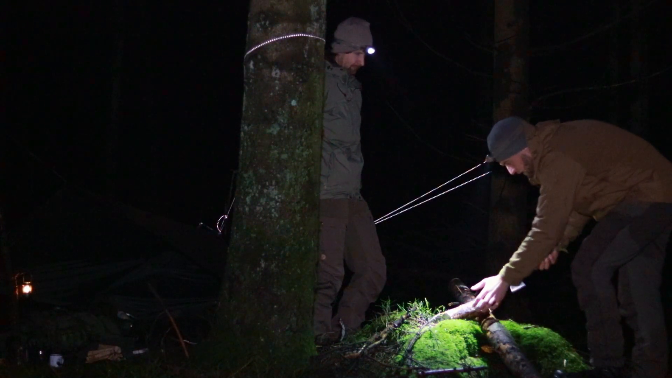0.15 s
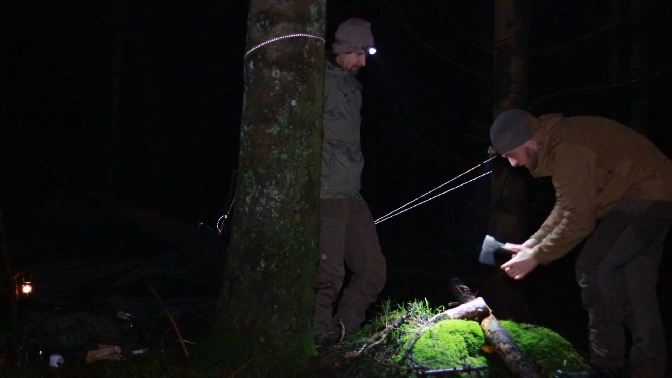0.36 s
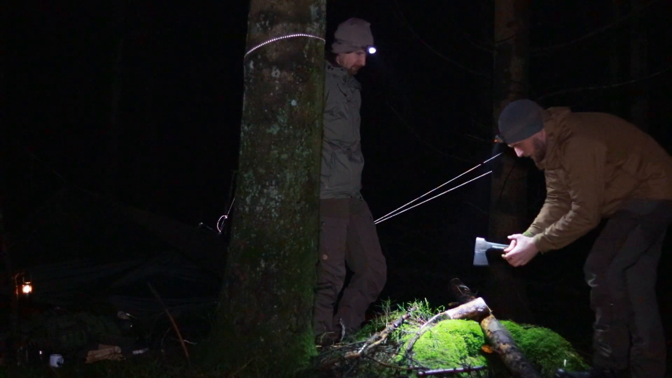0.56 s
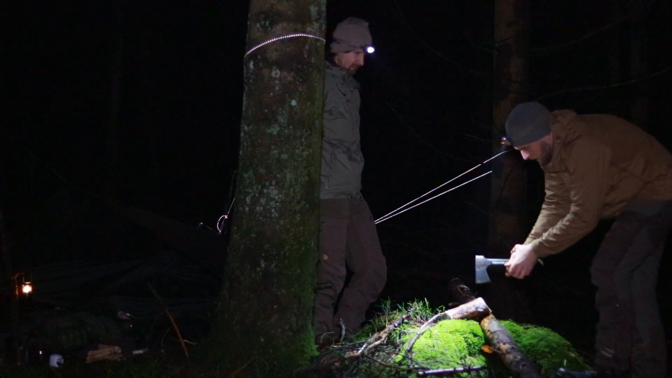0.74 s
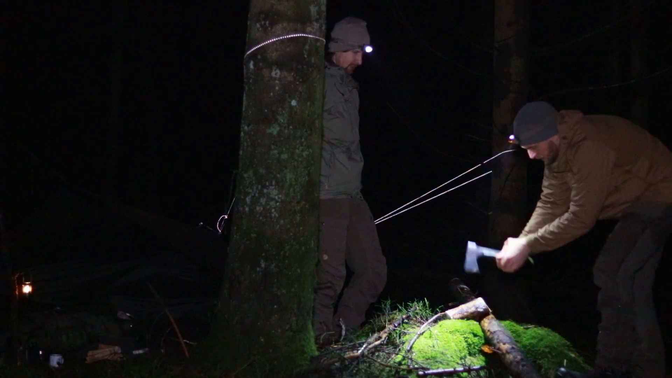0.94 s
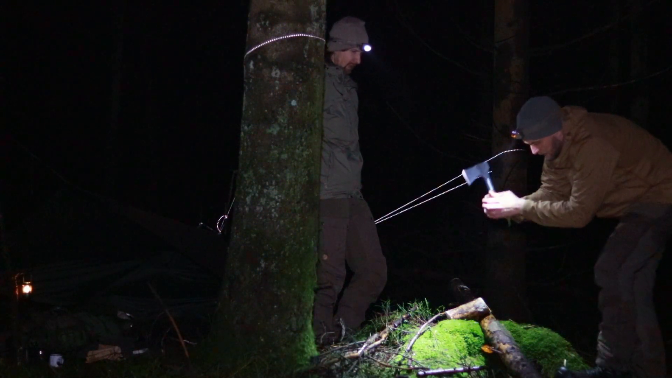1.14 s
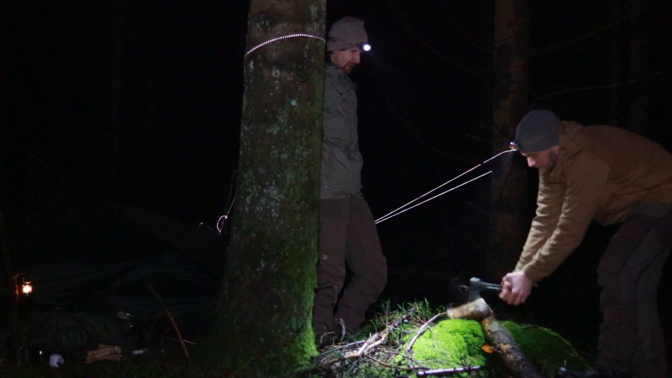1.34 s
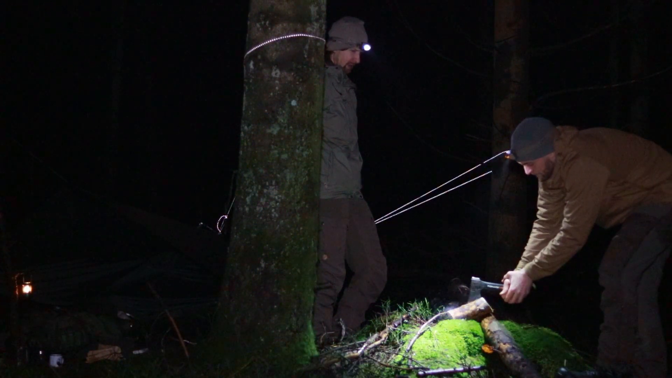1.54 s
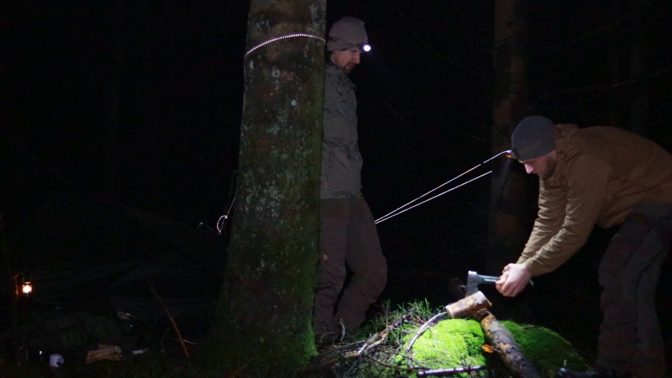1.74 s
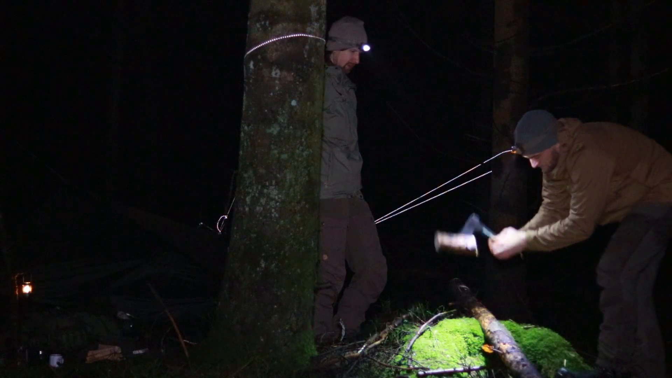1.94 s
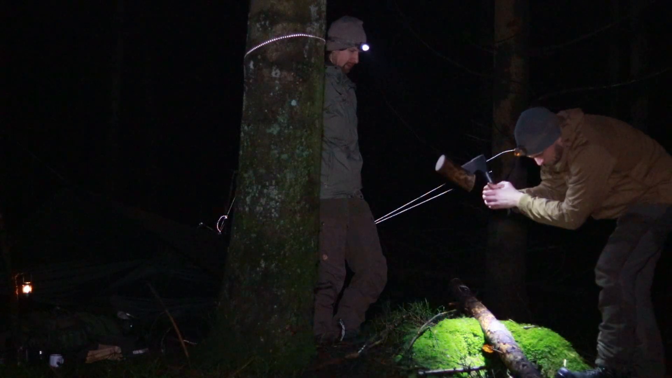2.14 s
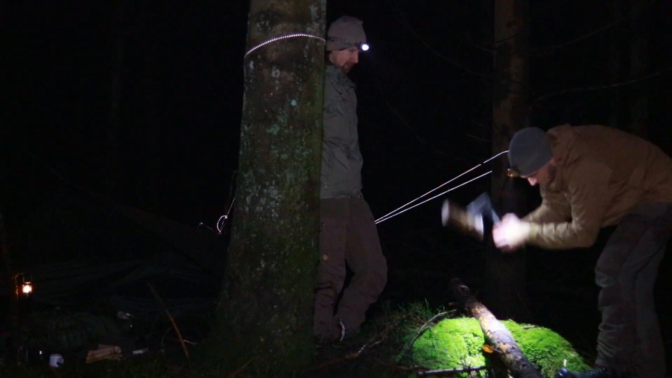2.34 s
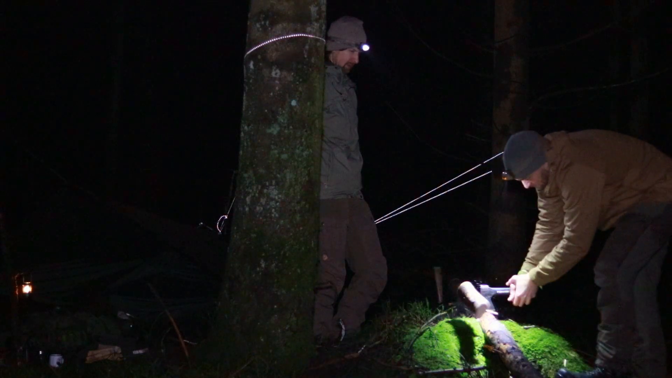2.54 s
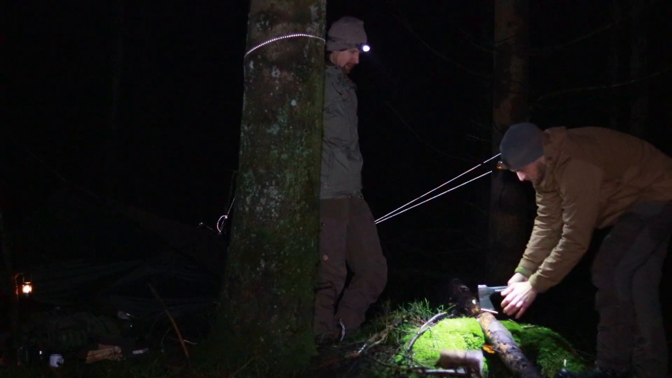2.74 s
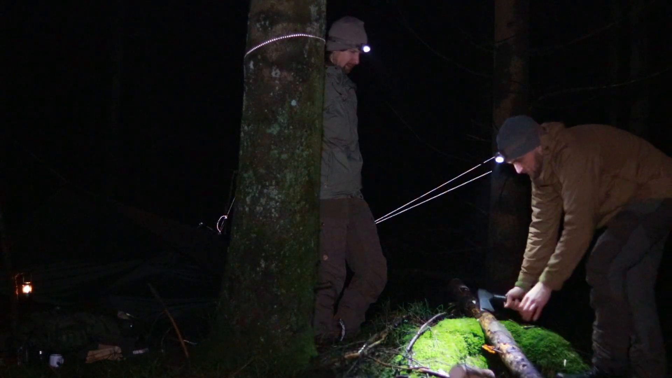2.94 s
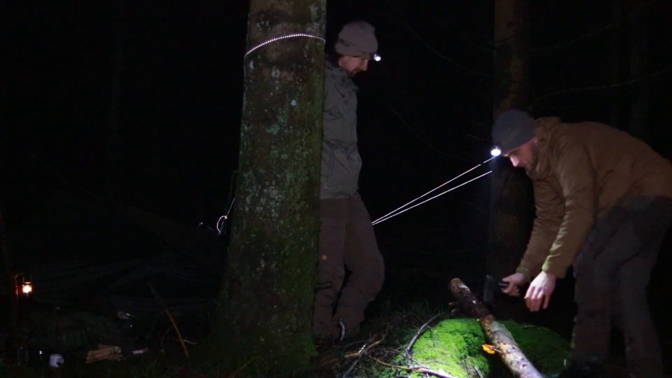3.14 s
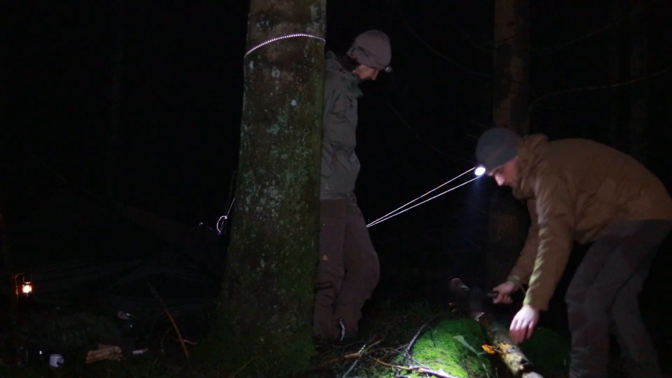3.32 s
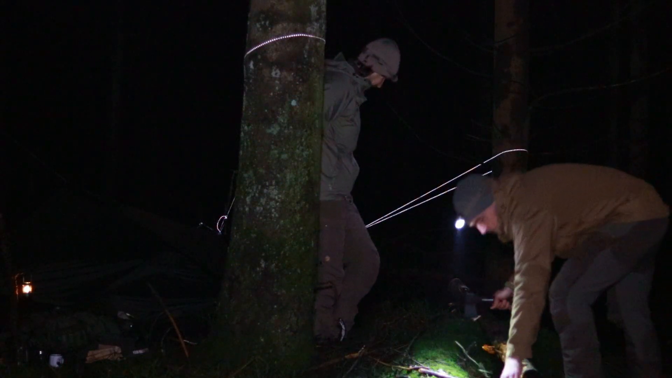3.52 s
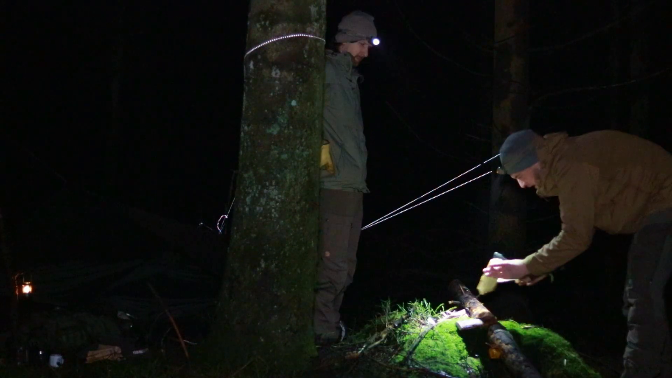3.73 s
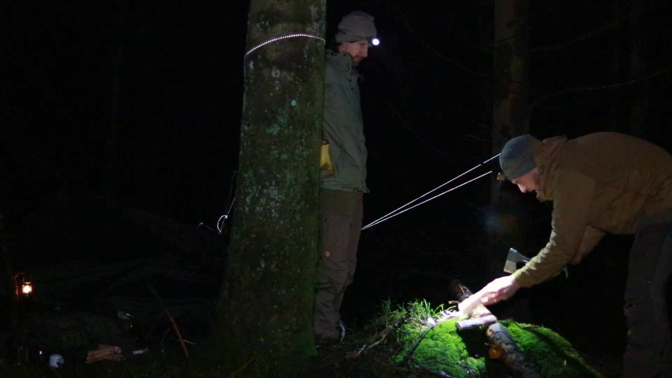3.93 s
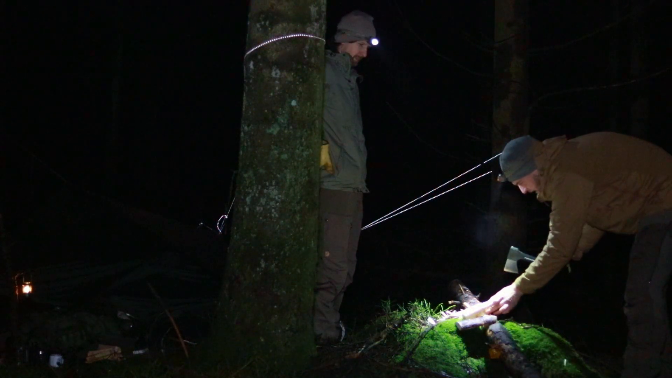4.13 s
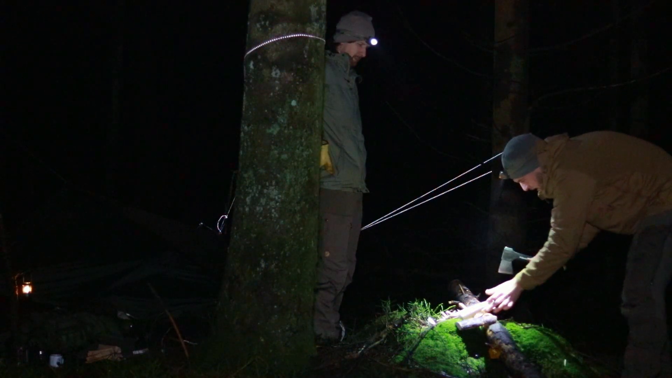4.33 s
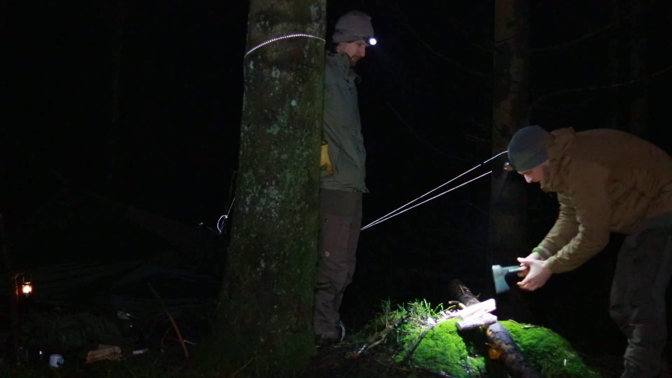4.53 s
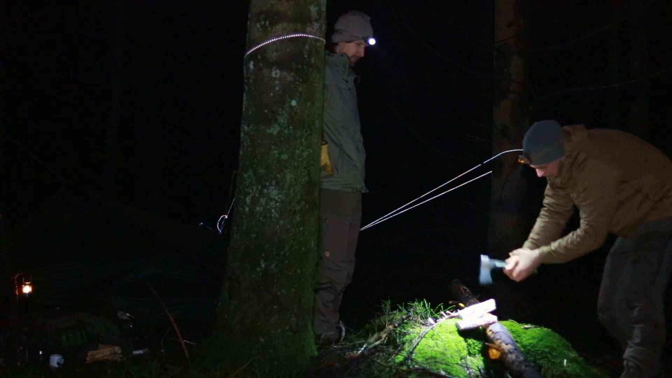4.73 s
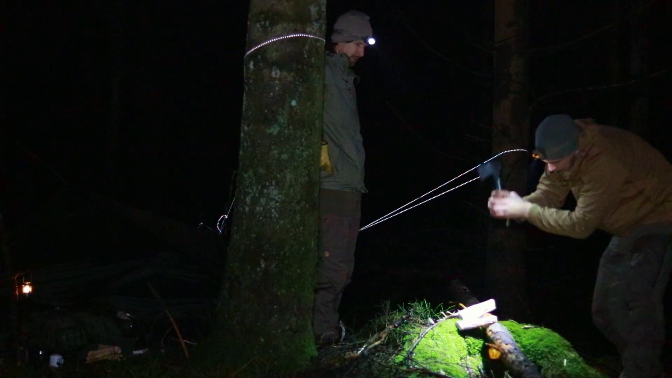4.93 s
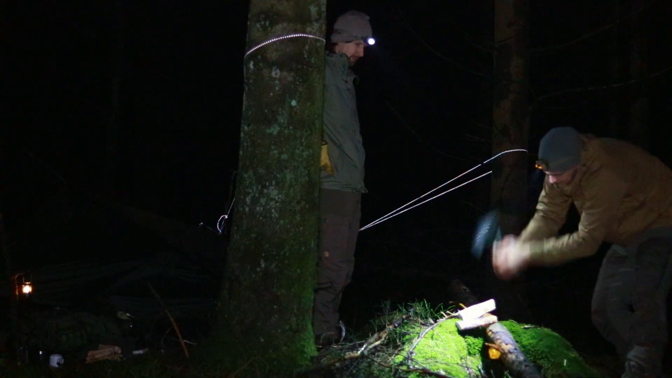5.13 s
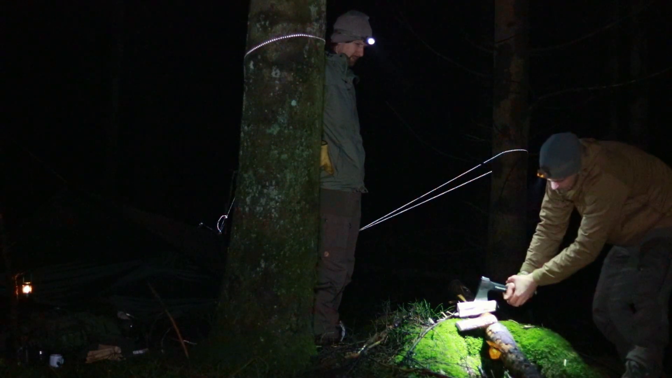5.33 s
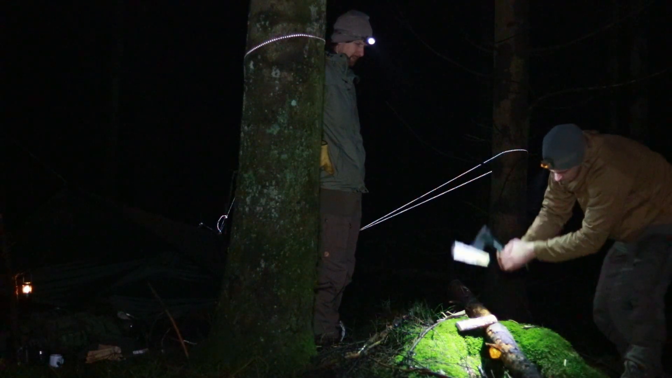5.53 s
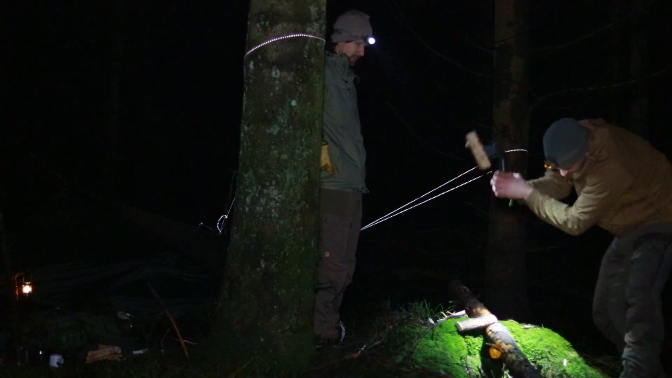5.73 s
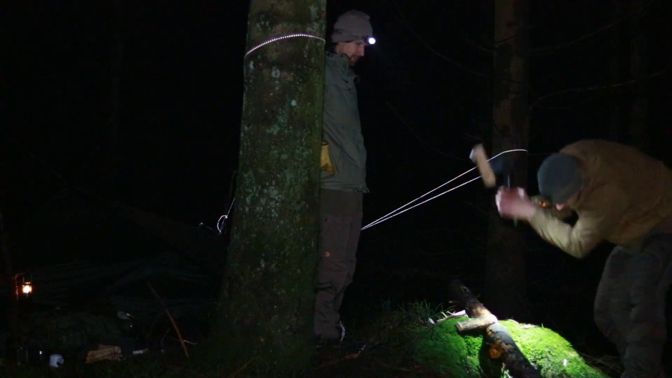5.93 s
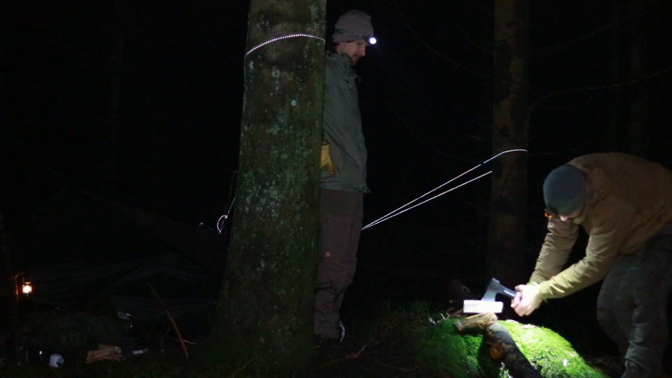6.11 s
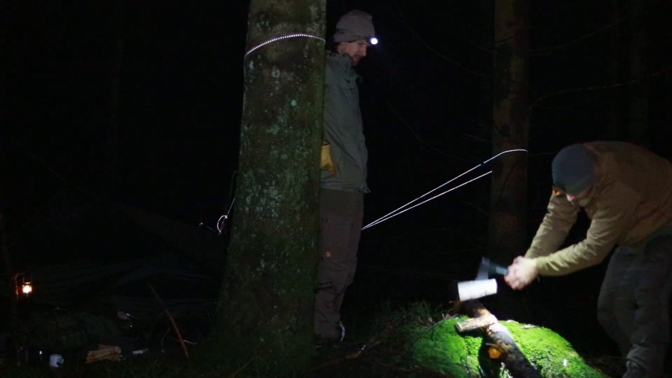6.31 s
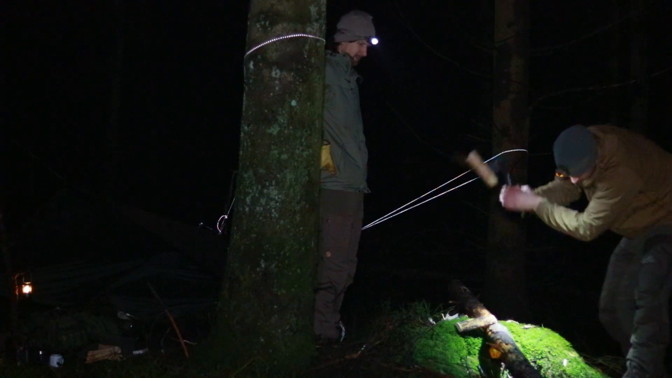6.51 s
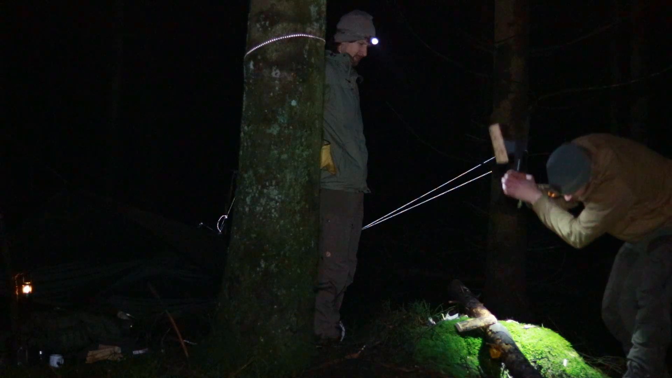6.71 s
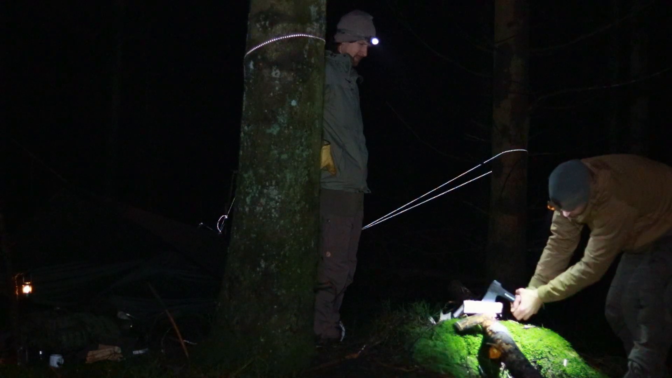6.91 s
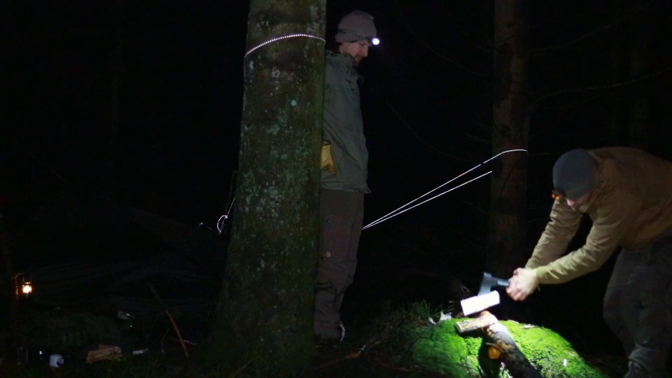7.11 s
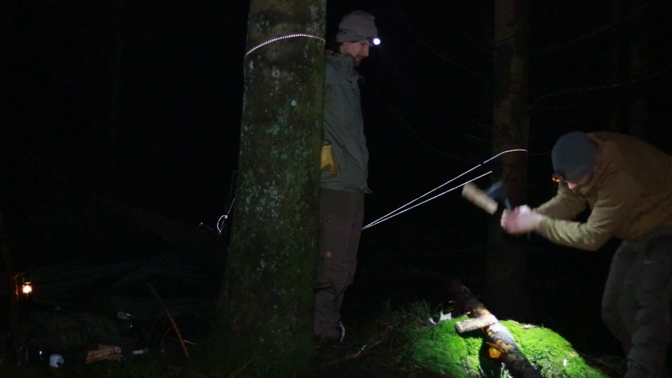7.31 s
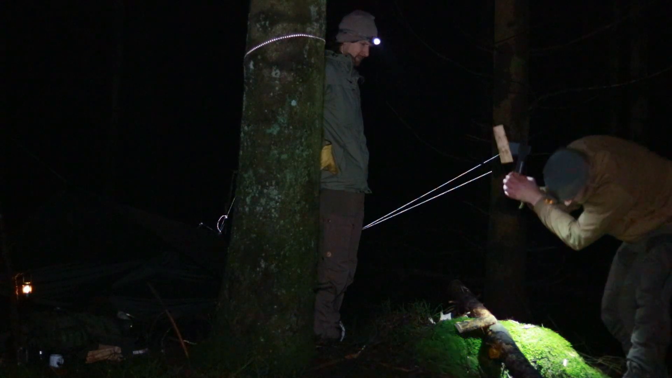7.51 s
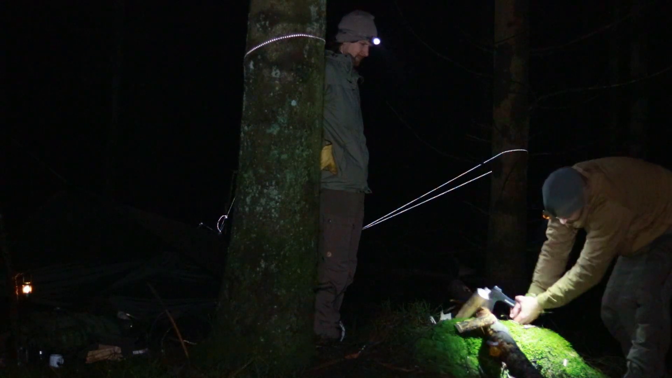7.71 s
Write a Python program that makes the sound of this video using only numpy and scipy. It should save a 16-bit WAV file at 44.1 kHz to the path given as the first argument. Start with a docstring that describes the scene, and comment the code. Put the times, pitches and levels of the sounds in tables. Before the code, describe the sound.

Close, dry hatchet blows on wood: low ground thud first, then a sharp woody knock and crack, with a diffuse forest echo. One blow, a pause, a splitting blow with a clear woody ring, then small taps, handling and grainy cloth rustle. Four louder, duller, more knocking blows finish the sequence. Beneath lies a very quiet, distant treetop murmur. Mono, outdoors, peaks slightly clipped.

```python
"""A hatchet splits short firewood on a log in a still forest.
Each blow thuds through the ground as damped log modes; resonant knocks and noise-burst cracks follow through the air.
Single trunks and a decaying noise echo throw them back. The second blow also frees a ringing billet.
Between the blows a flying piece lands, wood is touched and a jacket rustles in grainy hiss.
Far off, coloured noise makes the forest murmur. The microphone overloads at full scale."""
import sys
import numpy as np
from scipy import signal
from scipy.fft import rfft, irfft, next_fast_len
from scipy.io import wavfile
from scipy.ndimage import uniform_filter1d

SR = 44100
rng = np.random.default_rng(int(sys.argv[2]) if len(sys.argv) > 2 else 0)


def inscribe(sig):
    """Save sig as 16-bit PCM at rate SR to the path in sys.argv[1].

    A 1-D sig is mono; a 2-D sig holds one channel per row.
    Samples are clipped to [-1, 1] before scaling.
    """
    pcm = np.round(np.clip(np.atleast_2d(sig).T, -1, 1) * 32767)
    wavfile.write(sys.argv[1], SR, pcm.astype(np.int16))


N = 346626
T = np.arange(int(1.6 * SR)) / SR  # time axis of one sound, s
AIR_LAG_S = 0.0068  # the airborne sound trails the thud in the ground

# Hatchet blows. Each row: start in seconds, force in dB, wood knock level in dB, crack level in dB,
# crack decay in seconds, crack centre in Hz.
BLOWS = [(1.439, -4.5, -27, -13, 0.00052, 4330), (2.5239, -4, -20.5, -14.5, 0.0017, 7770),
         (5.2694, -.5, -14, -27.5, 0.00077, 4160), (6.1384, 1.5, -15, -15, 0.00069, 3670),
         (6.9610, 0.5, -13, -18.5, 0.0027, 5070), (7.7944, 1.5, -15.5, -14, 0.00062, 2430)]
# Wood knocked, picked up and set down. Each row: time in seconds, snap level in dB, ground thud level in dB.
TOUCHES = [(3.199, -46, -58), (3.374, -44.5, -44), (3.391, -58, -50), (3.456, -30.5, -26),
           (3.690, -49, -46), (4.160, -53, -46), (5.472, -52, -66)]


def from_db(db):
    """Decibels to gain."""
    return 10 ** (np.asarray(db) / 20)


def at_hz(points, hz):
    """Read a table on a log-frequency axis."""
    f, value = np.transpose(points)
    return np.interp(np.log(np.maximum(hz, 1)), np.log(f), value)


def add(out, s, sound):
    """Mix a sound in at time s."""
    i = int(round(s * SR))
    out[i:i + len(sound)] += sound[:N - i]


def unit_hit(x):
    """Scale to the energy of 10 ms at rms 1."""
    return x / np.sqrt(np.sum(x ** 2) / (SR / 100))


def lowpass(x, top_hz):
    """Gentle second-order treble cut."""
    return signal.sosfilt(signal.butter(2, top_hz, fs=SR, output="sos"), x)


def colour(x, spectrum):
    """Causal (minimum-phase) filter with the given spectrum, made by folding its cepstrum."""
    size = next_fast_len(len(x) // 2 + 1) * 2
    hz = np.arange(size // 2 + 1) * SR / size
    cepstrum = irfft(np.log(from_db(at_hz(spectrum, hz))))
    cepstrum[1:size // 2] *= 2
    cepstrum[size // 2 + 1:] = 0
    return irfft(rfft(x, size) * np.exp(rfft(cepstrum)))[:len(x)]


def noise(spectrum):
    """Steady coloured noise, rms 1."""
    x = colour(rng.standard_normal(N), spectrum)
    return x / x.std()


def resonate(x, modes):
    """Parallel two-pole resonances of alternating sign."""
    out = 0
    for k, (hz, width, db) in enumerate(modes):
        r = np.exp(-np.pi * width / SR)
        poles = [1, -2 * r * np.cos(2 * np.pi * hz / SR), r * r]
        mode = (1 - r * r) / 2 * signal.lfilter([1, 0, -1], poles, x + 1e-18)  # the offset avoids denormals
        out = out + (-1) ** k * from_db(db) * mode
    return out


def hatchet(through_s=0.00607, thud_echo_db=-22):
    """Thud through the ground, then bite, knock and crack through the air, single trunks and the forest."""
    # The short piece under the blade. Each row: mode in Hz, width in Hz, relative level in dB.
    piece = [(742, 72, 5.5), (1030, 143, 4), (1330, 276, 1.5), (1676, 475, -5)]
    # a blow above 0 dB presses the log into the moss, which shortens its ring
    free_ring_time, damping_per_db = 1.02, 0.18  # factor on the log's t60; exponential rate per dB
    follow_through_db = -30  # every blow ends in a small push into the moss
    bite_lead_s, bite_db = 0.0025, -14.5  # the edge bites just before the fibres tear; dB from the crack
    # a harder blow carries its knock farther into the forest
    knock_echo_db, knock_echo_growth = -24.5, 2.3  # at force 0 dB; dB per dB of force
    crack_echo_db, crack_echo_growth = -11, 0.92  # after a crack of 0 dB; dB per dB of crack
    near, cracks, far_wood, far_crack = np.zeros((4, N))
    blow = signal.unit_impulse(len(T))
    knock = unit_hit(resonate(blow, piece))
    for s, force_db, knock_db, crack_db, crack_s, crack_hz in BLOWS:
        air_s = s + AIR_LAG_S
        ring_time = free_ring_time * np.exp(-damping_per_db * max(force_db, 0))
        ground = from_db(force_db) * thud(ring_time)
        add(near, s, ground)
        add(near, s + through_s, from_db(follow_through_db) * follow_through(width_s=0.0008, log_db=6))
        add(near, air_s, from_db(knock_db) * knock)
        add(cracks, air_s, from_db(crack_db) * crack(tearing(crack_s), crack_hz))
        add(near, air_s - bite_lead_s, from_db(crack_db + bite_db) * crack(burst(crack_s), crack_hz))
        # the forest catches the crack from all sides, so only its mean colour comes back
        far_crack_db = crack_echo_db + crack_echo_growth * crack_db
        add(far_crack, air_s, from_db(far_crack_db) * crack(blow, crack_hz))
        far_knock = from_db(knock_echo_db + knock_echo_growth * force_db) * knock
        add(far_wood, air_s, far_knock + from_db(thud_echo_db) * ground)
    # the cracks and the knocks each get a forest echo of their own
    return near + trunks(cracks) + forest(far_crack) + forest(far_wood)


def thud(ring_time=1, lag_cycles=0.605, contact_hz=1400, contact_s=0.00068, spread_db=2.33):
    """Log modes through the ground: low waves travel slower and arrive later; each hit lands a little elsewhere."""
    # Log and ground. Each row: mode in Hz, mean level in dB, t60 in seconds at ring_time 1.
    log_modes = [(147.3, -38, 0.38), (204, -24.5, 0.12), (238, -7, 0.17), (303.7, 4, 0.028),
                 (328.5, -11.5, 0.18), (356, 0.5, 0.017), (439, -11, 0.059), (618.5, -6, 0.043),
                 (767, -12, 0.057), (840, -0.5, 0.0077), (1214, -8, 0.031)]
    # Sense in which each mode moves the ground at the microphone: one sign per mode.
    log_sense = [1, 1, 1, -1, -1, 1, 1, -1, -1, 1, 1]
    out = 0
    for sense, (hz, db, t60) in zip(log_sense, log_modes):
        age = np.maximum(T - lag_cycles / hz, 0)
        decay_db = np.minimum(60 * age / (t60 * ring_time), 200)
        level = db + spread_db * rng.standard_normal() - decay_db
        out = out + sense * from_db(level) * np.sin(2 * np.pi * hz * age)
    bite = 1 - np.exp(-(T / (2 * contact_s)) ** 2)  # the force builds as the wood meets the log
    return lowpass(out * bite, contact_hz)


def follow_through(width_s, log_db, peak_s=0.0014):
    """The blade breaks through and lands on the log: one deep push into the moss and a second thud."""
    pulse = -np.exp(-((T - peak_s) / width_s) ** 2)
    push = signal.sosfilt(signal.butter(1, 70, "high", fs=SR, output="sos"), pulse)
    return unit_hit(push) + from_db(log_db) * thud()


def crack(x, centre_hz, peak_db=0, peak_share=0.32):
    """Tearing wood: broad, with one hump set by the size of the sliver; its width is a share of its centre."""
    # Fibres tearing. Each row: frequency in Hz, relative density in dB per Hz.
    fibres = [(300, -9), (900, -3.5), (1800, 6.5), (3200, 0), (4500, 0.5), (6000, -3.5), (8000, -2),
              (10000, -8), (12500, -8), (16000, -13.5)]
    broad = colour(x, fibres)
    return unit_hit(broad + resonate(broad, [(centre_hz, peak_share * centre_hz, peak_db)]))


def tearing(decay_s, again_s=0.0036, again_db=-11, splinter_db=-17, splinter_s=0.01):
    """The split opens with a jerk, runs on with a second one, and the last splinters let go."""
    again = np.roll(burst(decay_s), int(again_s * SR))
    return burst(decay_s) + from_db(again_db) * again + from_db(splinter_db) * burst(splinter_s)


def burst(decay_s, rise_s=0.00048, count=4096):
    """A quickly dying volley of tiny fractures, evened out so that it has no pitch of its own."""
    t = T[:count]
    spectrum = rfft(rng.standard_normal(count) * np.exp(-t / decay_s))
    even = np.sqrt(uniform_filter1d(np.abs(spectrum) ** 2, size=80))
    fade = (1 - np.exp(-t / rise_s)) * np.cos(np.pi / 2 * t / t[-1]) ** 2
    return np.pad(irfft(spectrum / even) * fade, (0, len(T) - count))


def split(through_s=0.00572, ring_echo_db=1.0):
    """The wood parts at the second blow: the blade drives on into the log and the freed billet rings out."""
    # The billet that springs free. Each row: mode in Hz, width in Hz, relative level in dB.
    billet = [(1865, 22, 7.5), (2056, 530, 0), (2550, 1100, -2), (2870, 75, 0.5), (4300, 185, -1),
              (7630, 86, -12)]
    split_s, push_db, ring_db = BLOWS[1][0], -14, -17.5
    push, ring = np.zeros((2, N))
    add(push, split_s + through_s, from_db(push_db) * follow_through(width_s=0.0005, log_db=5.5))
    free_ring = unit_hit(resonate(signal.unit_impulse(len(T)), billet))
    add(ring, split_s + AIR_LAG_S, from_db(ring_db) * free_ring)
    return push + trunks(ring) + from_db(ring_echo_db) * forest(ring)


def trunks(x):
    """The direct sound and its echoes from single trunks, each delayed and dulled."""
    # Trunks that throw the sound back. Each row: delay in seconds, level in dB, treble limit in Hz.
    single_trunks = [(.015, -17, 11900), (0.1313, -23.5, 4500), (.148, -26, 3200)]
    out = x.copy()
    for lag_s, db, top_hz in single_trunks:
        add(out, lag_s, from_db(db) * lowpass(x + 1e-18, top_hz))
    return out


def forest(x, rise_s=0.00093, grain_db=1.5, swell_db=2.0, swell_s=0.16, swell_half_s=0.066):
    """Banded noise echo from many trunks, decaying per band; it swells as a ring of farther trees answers."""
    # Echo strength. Each row: frequency in Hz, level in dB.
    echo_colour = [(150, -4), (500, -4.5), (1000, .5), (1600, -3), (4000, -0.5), (8000, 2), (12000, -1),
                   (16000, -14)]
    # Echo length. Each row: frequency in Hz, t60 in seconds.
    echo_t60 = [(150, 0.32), (1000, 1.9), (2200, 1.9), (4500, 1.35), (8000, 0.89), (12000, 0.61),
                (16000, .35)]
    grain = np.repeat(rng.standard_normal(len(T)), repeats=48)[:len(T)]  # level steps every 48 samples
    scatter = rng.standard_normal(len(T)) * from_db(grain_db * grain)
    spectrum = rfft(scatter / scatter.std())
    hz = np.arange(len(T) // 2 + 1) * SR / len(T)
    centres = np.geomspace(150, 16000, 14)
    response = 0
    for centre, share in zip(centres, np.eye(len(centres))):
        # overlapping triangular bands that sum to one
        band = irfft(spectrum * at_hz(np.column_stack([centres, share]), hz), len(T))
        level = at_hz(echo_colour, centre) - 60 * T / at_hz(echo_t60, centre)
        response = response + band * from_db(level)
    swell = from_db(swell_db * np.exp(-((T - swell_s) / swell_half_s) ** 2))
    response = response * swell * (1 - np.exp(-T / rise_s)) / np.sqrt(swell_s * SR)
    return signal.fftconvolve(x, response)[:N]


def ticks(snap_s=0.00063, snap_lag_s=0.0029, echo_db=-23):
    """Small wood: a flying piece taps, clinks and bounces; each touch is a little ground thud, then a snap."""
    # The piece against something hard. Each row: mode in Hz, width in Hz, relative level in dB.
    clink = [(4570, 370, -9.5), (7500, 480, -9), (8700, 820, -11), (11900, 550, 3.5)]
    tap_s, tap_db, tap_hz, tap_width_hz = 2.857, -37, 1130, 280
    clink_s, clink_db, bounce_s, bounce_db = 2.8755, -25, 0.015, -14  # bounce: after and from the clink
    touch_hz, touch_soft_hz = 8100, 324  # centre of the snap; top of its soft thud
    landing = [
        (tap_s, tap_db, [(tap_hz, tap_width_hz, 0)]),
        (clink_s, clink_db, clink),
        (clink_s + bounce_s, clink_db + bounce_db, clink[:1]),  # bounces on its lowest mode
    ]
    snaps, thuds = np.zeros((2, N))
    ground = thud(contact_hz=touch_soft_hz)
    for s, db, modes in landing:
        add(snaps, s, from_db(db) * unit_hit(resonate(burst(snap_s), modes)))
    for s, snap_db, thud_db in TOUCHES:
        add(thuds, s - snap_lag_s, from_db(thud_db) * ground)
        add(snaps, s, from_db(snap_db) * crack(burst(snap_s), touch_hz, peak_db=3, peak_share=0.63))
    return snaps + thuds + from_db(echo_db) * forest(snaps)


def rustles(grain_db=3.5):
    """Soft swells of grainy hiss as the arms move and each touch of the wood stirs the litter."""
    # Sleeves brushing as the arms move. Each row: centre in seconds, half length in seconds, level in dB.
    sleeves = [(0.486, .02, -54.5), (1.27, 0.3, -62), (3.605, 0.061, -57), (3.737, 0.016, -50),
               (5.186, 0.054, -51)]
    # Colour of the hiss. Each row: frequency in Hz, relative density in dB per Hz.
    hiss = [(800, -4), (2500, -4), (4200, -7), (6500, -9.5), (8300, -8), (11000, -23), (16000, -12.5)]
    # a firm touch stirs the litter more: level after a snap of 0 dB, dB per dB of snap
    litter_db, litter_growth = -31, 0.58
    litter_lag_s, litter_half_s = 0.0088, 0.03
    t = np.arange(N) / SR
    litter = [(s + litter_lag_s, litter_half_s, litter_db + litter_growth * snap_db) for s, snap_db, _ in TOUCHES]
    swell = 0
    for s, half_s, db in list(sleeves) + litter:
        swell = swell + from_db(db) * np.exp(-np.minimum(((t - s) / half_s) ** 2, 50))
    grain = uniform_filter1d(rng.standard_normal(N), size=90)
    return swell * from_db(grain_db * grain / grain.std()) * noise(hiss)


def murmur():
    """Distant air in the treetops: steady coloured noise, slowly swelling."""
    # Far murmur with a faint hiss on top. Each row: frequency in Hz, relative density in dB per Hz.
    treetops = [(18, -63.5), (30, -40), (55, -17.5), (97, -14.5), (130, -13.5), (237, -4), (324, 0),
                (455, -0.5), (505, 0.5), (852, -2), (1050, -5.5), (1910, -13), (2240, -17.5),
                (14000, -25.5), (15500, -25.5)]
    start_db, rise_db_per_s = -51, 0.42
    return from_db(start_db + rise_db_per_s * np.arange(N) / SR) * noise(treetops)


def scene():
    """All sources at one microphone."""
    return (hatchet() + split() + ticks() + rustles() + murmur())[None]


def record(dry):
    """The microphone clips at full scale, then a steep low-pass cuts the top."""
    cutoff_hz = 15700
    clipped = np.clip(dry, -1, 1)
    return signal.sosfilt(signal.ellip(10, 0.1, 70, cutoff_hz, fs=SR, output="sos"), clipped)


dry = scene()
out = record(dry)
inscribe(out)
```